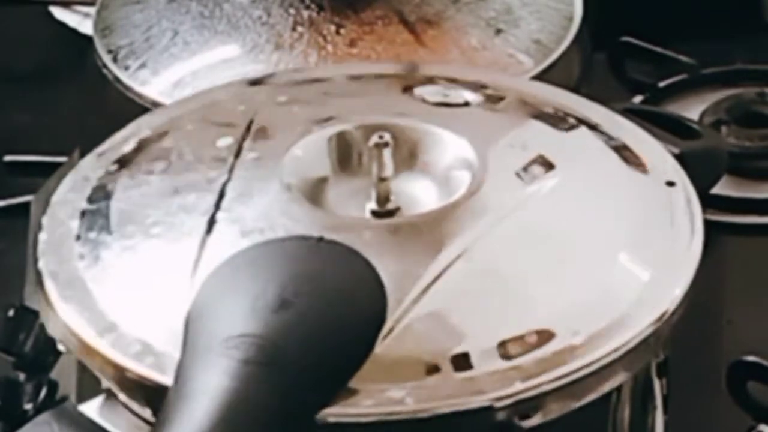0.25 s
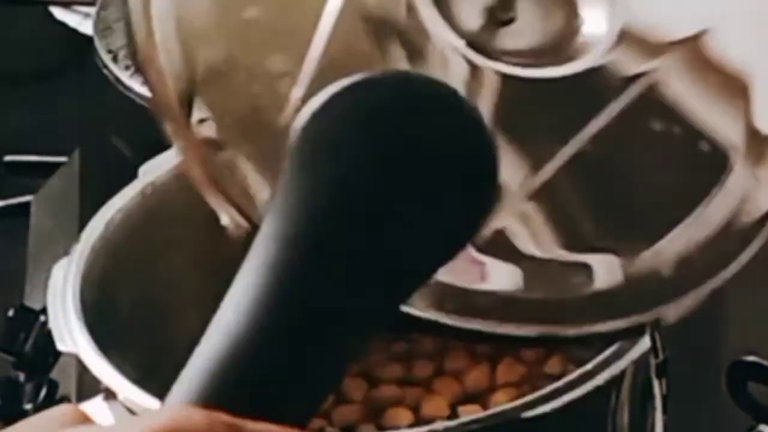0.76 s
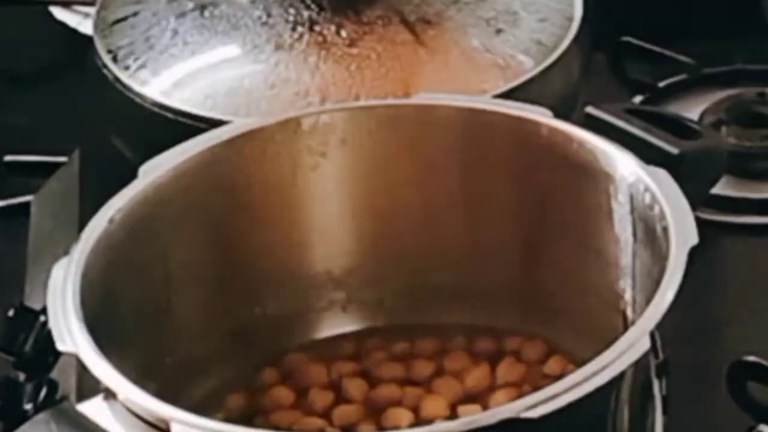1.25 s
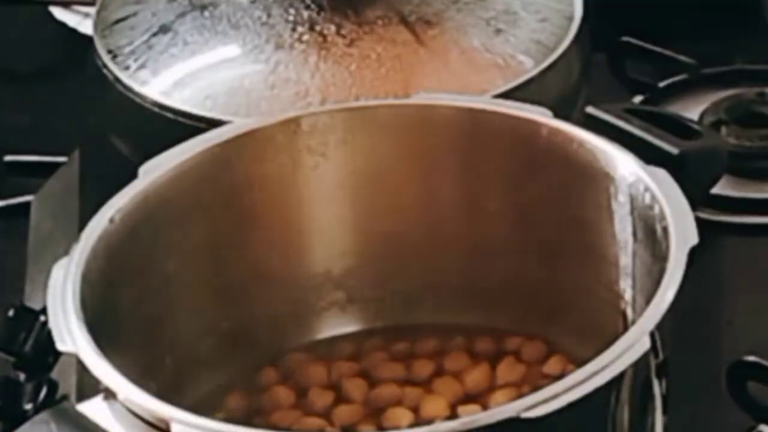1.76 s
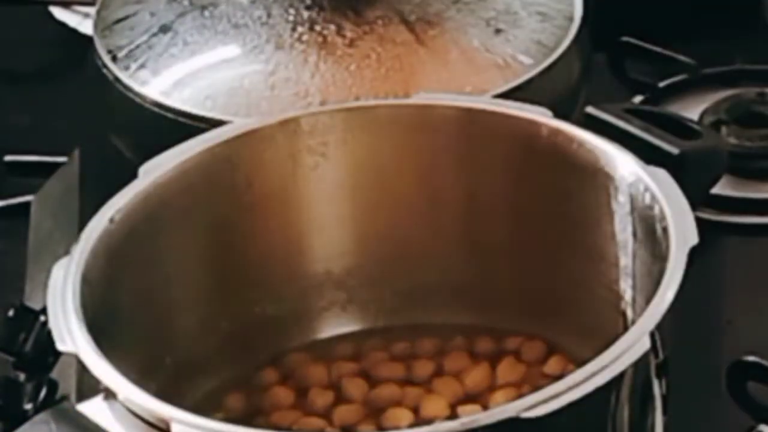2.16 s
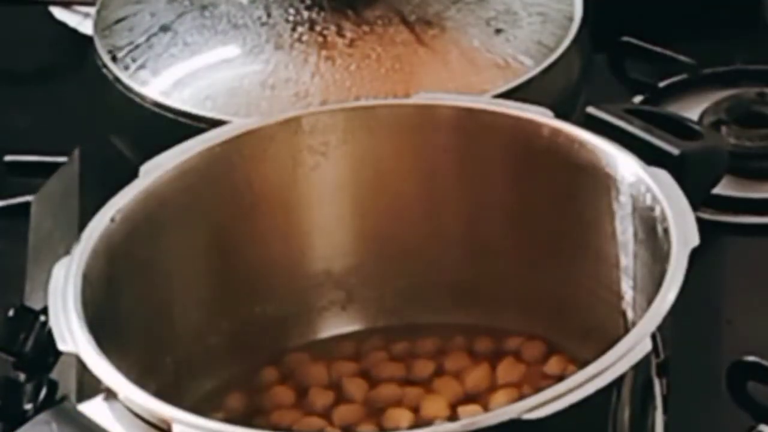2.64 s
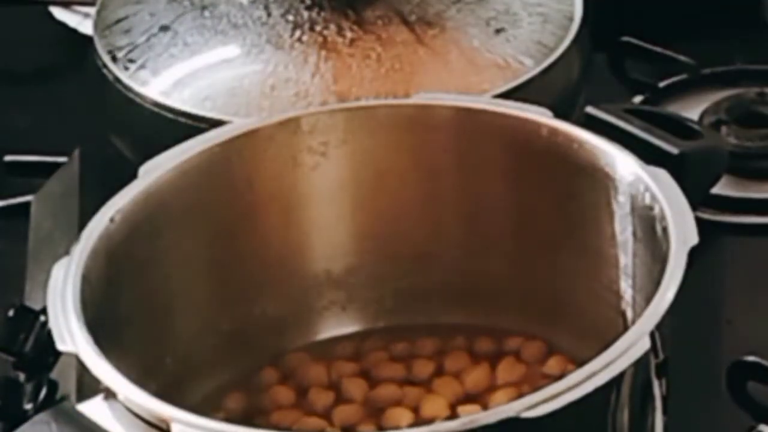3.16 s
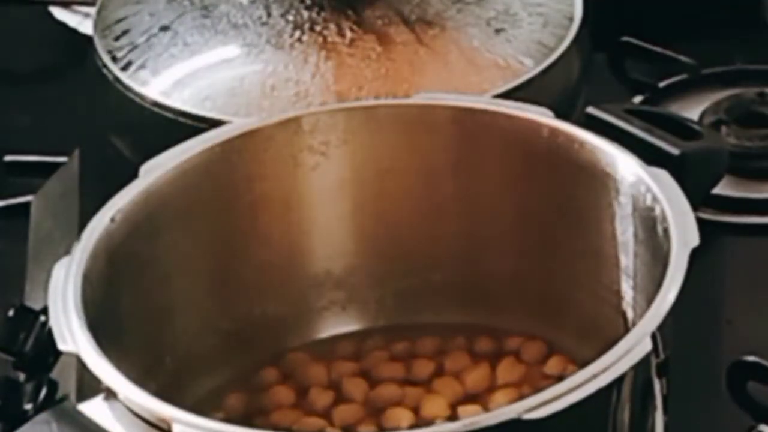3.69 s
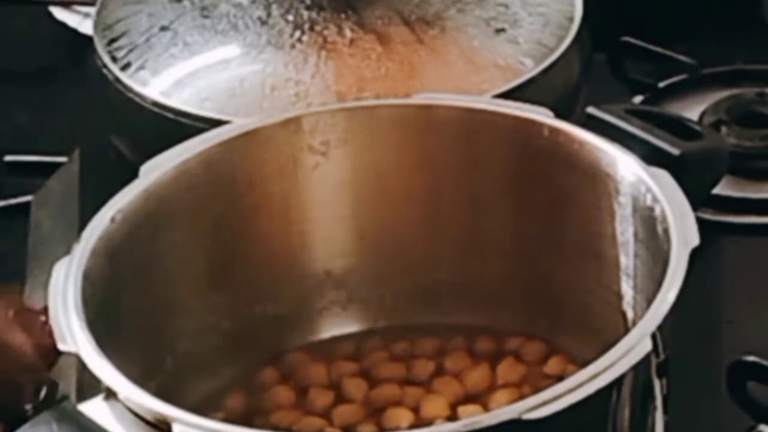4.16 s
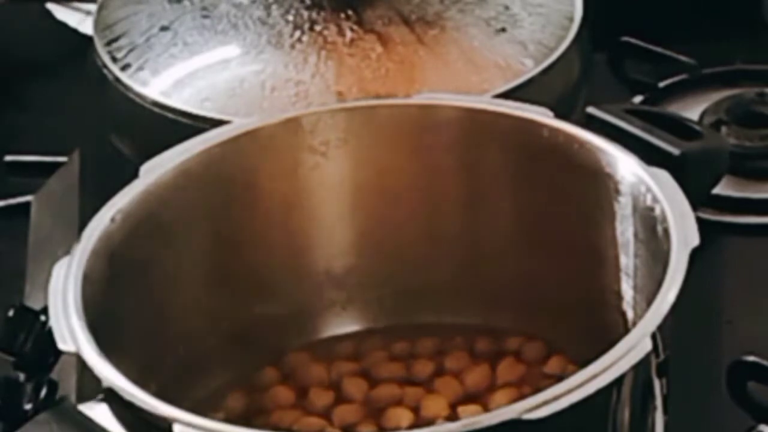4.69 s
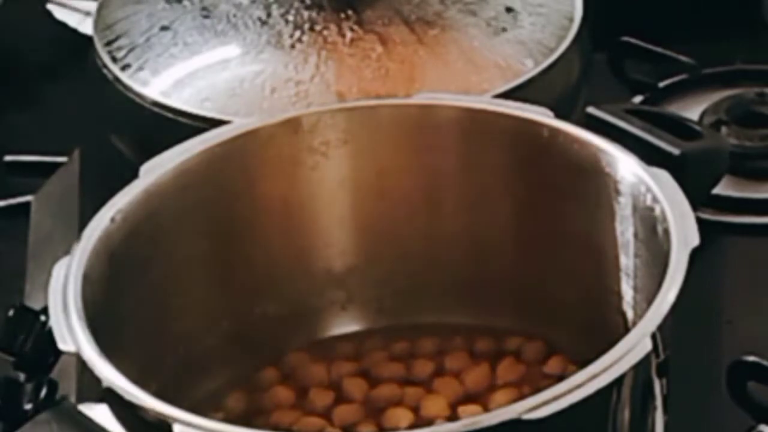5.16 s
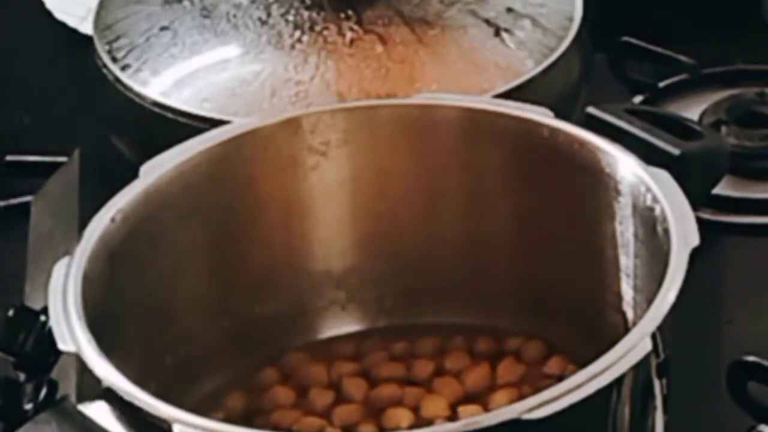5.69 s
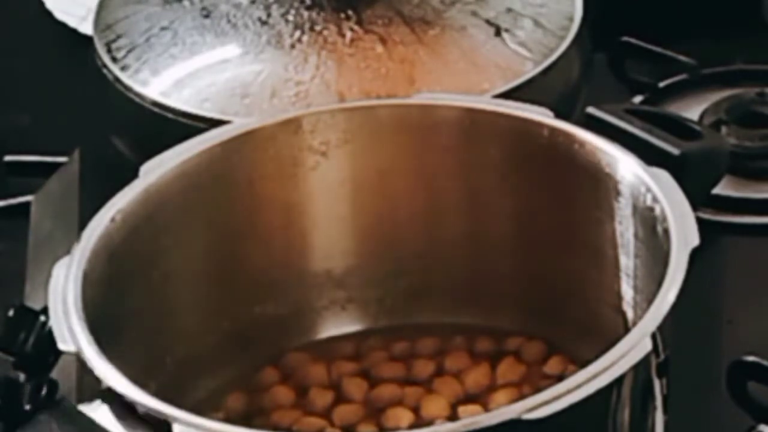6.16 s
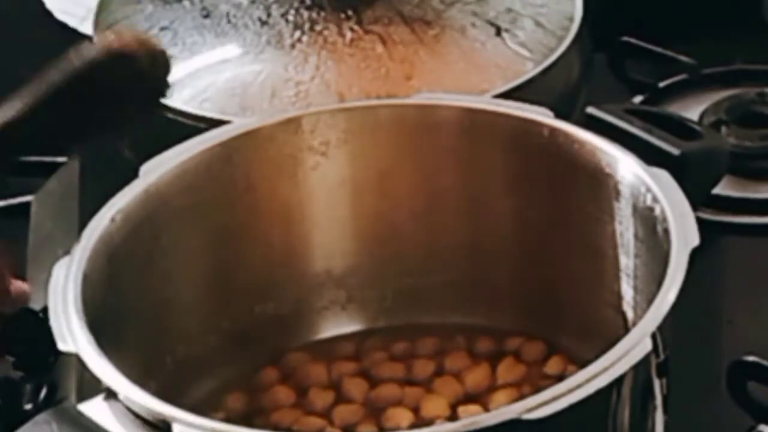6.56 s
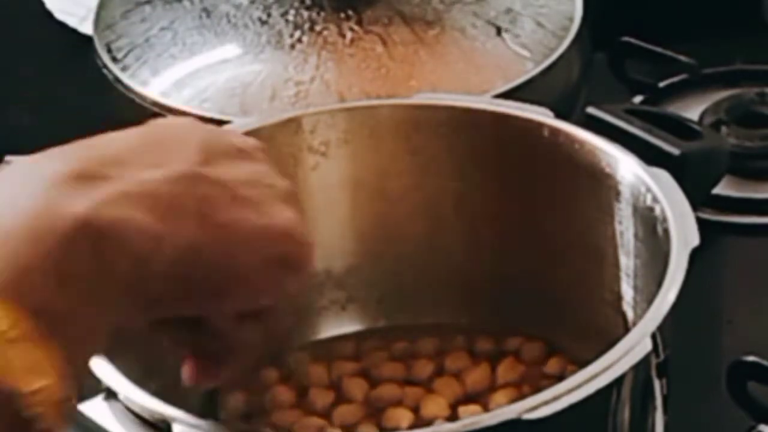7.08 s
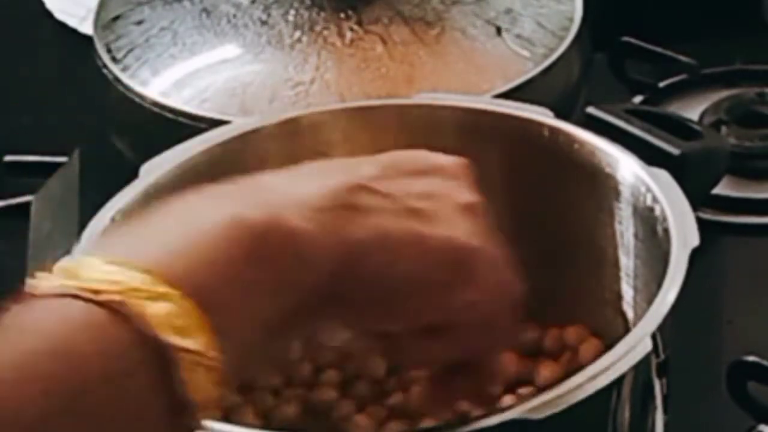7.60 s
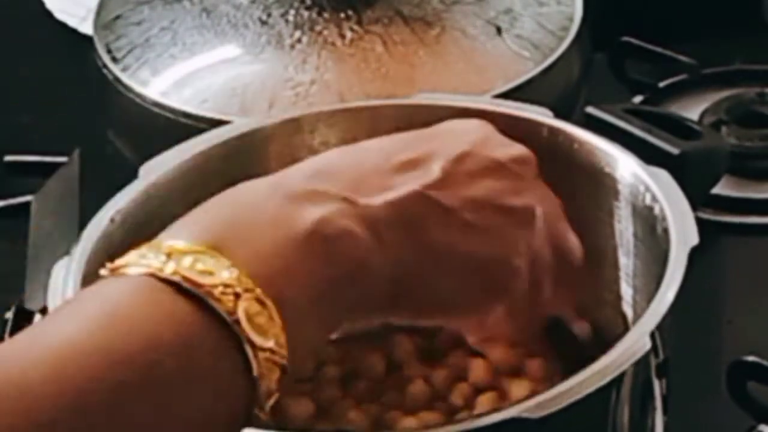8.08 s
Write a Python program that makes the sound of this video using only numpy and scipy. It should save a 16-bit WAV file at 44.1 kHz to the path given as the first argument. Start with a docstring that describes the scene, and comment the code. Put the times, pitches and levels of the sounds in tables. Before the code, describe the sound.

Quiet scraping of a metal lid and a soft, low pop open the scene over thin, wavering burner hiss. Later the lid drops to one side with a ringing clatter that speeds up and dies, capped by a sharp slap. Small metal clinks and duller knocks follow, then near quiet. A tool pushes soft, grainy chickpeas in a pot and strikes the wall with a bright clank. Close microphones, short lively kitchen echo.

```python
"""A steel pressure cooker is opened in a small hard-walled kitchen: the lid scrapes out of its lugs and pops free.
It is set down to one side, rattles to rest and its handle slaps down; utensils knock and clink on the counter.
Then a masher taps into the pot of chickpeas and clanks on the steel wall, over the thin hiss of the stove.
Blows are modal: noise bursts stand for dense, short-lived modes, and decaying sines for modes that ring on.
Shaped stereo noise makes the stove and room at rest; echoes and a diffuse tail make the kitchen."""
import sys
import numpy as np
from scipy import signal
from scipy.fft import rfft, irfft
from scipy.io import wavfile
from scipy.ndimage import map_coordinates

SR = 44100
rng = np.random.default_rng(int(sys.argv[2]) if len(sys.argv) > 2 else 0)


def store_pcm(level_fs):
    """Save levels as 16-bit WAV."""
    pcm = np.round(np.clip(level_fs, -1, 1) * 32767).astype(np.int16)
    wavfile.write(sys.argv[1], SR, np.atleast_2d(pcm).T)


N = 367794

# Blow levels are relative: each layer's gain_db is added to them.
# Colours and mode levels are relative too, since each sound is scaled to unit energy.
# dense modes of a tapped pot, also used for the chickpeas: hz, level_db
POT_COLOUR = [(150, -27.5), (320, -9.5), (520, -3.5), (680, -16), (850, 3), (1050, -7), (1750, -1.5),
              (2300, -13.5), (2900, -9), (3900, -28.5), (4400, -27.5), (6000, -35), (15000, -46)]

SIZE = 2 ** 15   # samples in one blow or room response
HZ = np.maximum(np.arange(SIZE // 2 + 1) * SR / SIZE, 1)
AGE = np.arange(SIZE) / SR   # seconds since the blow


def opening(room):
    """Stick-slip friction grates the lugs and rings the rim; the released gasket gives a hollow pop."""
    # the lid scraping along the rim: start_s, level_db, brightness_db_per_octave
    scrapes = [(0.233, -34, 9), (0.244, -33.5, -2.5), (0.324, -34.5, 2.5), (0.356, -38.5, -1),
               (0.507, -31, -1)]
    # the rubber gasket letting go: start_s, level_db, brightness_db_per_octave
    pops = [(0.514, -28, 2), (0.52, -25, -4.5), (0.585, -41, 1)]
    # dense modes of the scrape, then of the pop: hz, level_db
    scrape_colour = [(60, -16), (110, 4), (200, -1.5), (850, -5.5), (1100, -7.5), (1750, -2), (2800, -10),
                     (4200, -10), (5400, -16.5), (7300, -5), (15000, -25.5)]
    pop_colour = [(60, -63), (160, -16.5), (245, 7), (275, 16.5), (350, -9.5), (500, -22), (1200, -34),
                  (5000, -31)]
    # the pot's rim ringing under the lugs: hz, level_db
    rim_modes = [(823.6, -58), (1012, -90), (1319, -62), (1814, -93), (2299, -66), (2638, -68), (3036, -68),
                 (3203, -61.5), (3596, -70), (4323, -64.5)]
    scrape = struck(scrapes, scrape_colour, gain_db=13.5, patter_t60=0.053,
                    modes=rim_modes, ring_db=-2, ring_t60=0.067)
    pop = struck(pops, pop_colour, gain_db=22.0, patter_t60=0.0068)
    scrape_heard = placed(scrape, room, wet_db=7.5, lag_samples=7.5, pan_db=1.7)
    pop_heard = placed(pop, room, wet_db=-6.0, lag_samples=5.6, pan_db=5)
    return scrape_heard + pop_heard


def setting_down(room):
    """Repeated impacts excite the plate modes of the lid on the counter; then its handle slaps down."""
    # dense modes of the lid: hz, level_db
    lid_colour = [(80, -42), (200, -13.5), (300, -1.5), (520, -6), (760, -23), (1050, -19.5), (1330, 7),
                  (1600, -16), (2200, 5), (3000, -14.5), (4500, -13), (5200, -25), (8000, -23),
                  (15000, -34.5)]
    # modes of the lid that ring on: hz, level_db
    lid_modes = [(958.2, -49), (1082, -50), (1308, -34), (1766, -44), (1906, -36), (1976, -44), (2056, -36),
                 (2099, -39), (2250, -37), (2320, -39), (2347, -41), (2417, -41), (2589, -47), (2643, -44),
                 (2686, -45), (3278, -48), (3391, -52), (3865, -59), (4113, -53), (4226, -49), (4404, -52),
                 (4764, -53)]
    # the handle slapping down: start_s, level_db, brightness_db_per_octave
    slaps = [(2.764, -6, -0.25), (2.775, -16, -3), (2.792, -11, 1.5)]
    # dense modes of the slap: hz, level_db
    slap_colour = [(60, -35.5), (150, -17.5), (300, -3.5), (430, -10), (600, -10.5), (760, 4.5), (1000, -2),
                   (1500, -5), (2100, 4.5), (2600, -5), (3200, -1.5), (5300, -14), (7500, -7),
                   (10000, -14.5), (15500, -21.5)]
    # modes of the slap that ring on: hz, level_db
    slap_modes = [(780.6, -53), (969.0, -48), (1195, -56), (1303, -47), (1933, -51.5), (2099, -45.5),
                  (2256, -46), (2455, -51.5), (2923, -56), (3138, -47), (3408, -48), (3887, -57)]
    lid = struck(lid_rocking(), lid_colour, gain_db=18.5, patter_t60=0.016,
                 modes=lid_modes, ring_db=-1, ring_t60=.25)
    slap = struck(slaps, slap_colour, gain_db=16.5, patter_t60=0.014,
                  modes=slap_modes, ring_db=-12.5, ring_t60=0.34)
    lid_heard = placed(lid, room, wet_db=-1, lag_samples=1.9, pan_db=2.0)
    slap_heard = placed(slap, room, wet_db=6.5, lag_samples=1.6, pan_db=1.5)
    return lid_heard + slap_heard


def lid_rocking(lands_s=2.302, first_swing_s=.167, swings=7, landing_db=-7, rebound_db=-4.5, swing_loss_db=1.89):
    """A rocking plate loses energy at each impact, so its swings grow shorter and weaker."""
    swing = np.arange(swings)
    intervals = first_swing_s / (1 + swing / 2) ** 2
    times = lands_s + np.cumsum(intervals)
    levels = rebound_db - swing_loss_db * swing
    return by_force([(lands_s, landing_db), *zip(times, levels)], neutral_db=-7.5, brightening=.1)


def pot_and_masher(room):
    """Damping sets the ring: light taps die early, while a clank on bare steel rings longer."""
    # crisp ticks of handling: start_s, level_db, brightness_db_per_octave
    ticks = [(3.114, -45, -1.5), (6.735, -42.5, 2.7)]
    # light taps on the pot, from lid, hand and masher: start_s, level_db, brightness_db_per_octave
    pot_taps = [(0.012, -41.5, 1.5), (0.636, -43.5, -1), (1.245, -60.5, -1), (3.155, -34, 2.5),
                (3.511, -34, 0.5), (7.279, -42, 7.5), (7.370, -31.5, 5), (7.457, -40, -3.5),
                (8.176, -33, 0)]
    # the masher clanking on the steel wall: start_s, level_db, brightness_db_per_octave
    clanks = [(8.024, -13, 1.5), (8.061, -24, -4.5)]
    # dense modes of the ticks, then of the clanks: hz, level_db
    tick_colour = [(400, -19.5), (1500, -21.5), (3200, -11.5), (5500, -21), (7500, -15), (10000, -24),
                   (15000, -27)]
    clank_colour = [(70, -26), (200, -18.5), (300, -7), (420, -17), (1000, -6.5), (2300, -2), (2750, -7.5),
                    (3250, 5.5), (4100, -5), (5700, -8), (7100, 2), (9000, -15), (15500, -20)]
    # modes that ring on in the tapped pot, then in the clanking wall: hz, level_db
    pot_modes = [(861.3, -45), (1168, -47), (1707, -54), (1879, -51), (2842, -56)]
    wall_modes = [(1717, -54), (2374, -55), (3208, -41), (3661, -48), (3709, -52), (4355, -61), (4947, -60),
                  (5297, -64), (6686, -58), (6891, -58), (7391, -57), (8872, -69)]
    tick = struck(ticks, tick_colour, gain_db=24, patter_t60=0.012)
    taps = struck(pot_taps, POT_COLOUR, gain_db=21.0, patter_t60=0.017,
                  modes=pot_modes, ring_db=-2.0, ring_t60=0.097)
    clank = struck(clanks, clank_colour, gain_db=19.5, patter_t60=0.018,
                   modes=wall_modes, ring_db=-4, ring_t60=.28)
    return placed(tick + taps + clank + chickpeas(), room, wet_db=6, lag_samples=5.1, pan_db=1.0)


def chickpeas(count=12, spread_db=3, settle_s=0.31, settle_db_per_s=63):
    """Granular contact: each push sets off little soft contacts that fade as the chickpeas settle."""
    # the masher pushing in: start_s, level_db of the first contacts
    pushes = [(7.56, -45), (7.819, -50), (8.161, -38.5)]
    contacts = []
    for start_s, level_db in pushes:
        # one contact at a random moment in each equal slot
        delays = settle_s * (np.arange(count) + rng.random(count)) / count
        levels = level_db - settle_db_per_s * delays + spread_db * rng.standard_normal(count)
        brightness = 1.5 + rng.normal(0, 4, count)   # dB per octave
        contacts += zip(start_s + delays, levels, brightness)
    in_time = [contact for contact in contacts if contact[0] < N / SR]
    return struck(in_time, POT_COLOUR, gain_db=11, patter_t60=0.012)


def utensils(room, touch_lead_s=.009, touch_db=-8):
    """Impact force sets brightness: light clinks and duller knocks take turns on the counter."""
    # light utensils clinking: start_s, level_db
    clink_blows = [(3.324, -23.5), (3.795, -24.5), (4.296, -29), (4.761, -26)]
    # knocks on the counter: start_s, level_db
    knock_blows = [(3.557, -17), (4.004, -14.5), (4.420, -26.5), (4.946, -17), (5.753, -36), (6.487, -45.5),
                   (7.012, -39)]
    # dense modes of the clinks, then of the knocks: hz, level_db
    clink_colour = [(100, -29), (260, -8), (500, -7), (780, -8), (1500, -7), (2050, 2), (2800, -14),
                    (3300, -10), (4800, -33), (6000, -27), (9000, -33), (15000, -38)]
    knock_colour = [(100, -36), (300, -12), (590, -7), (720, -13), (870, 0), (1200, 0), (1950, -1),
                    (2300, -9), (3100, -15), (4200, -33), (6000, -33), (15000, -43)]
    # modes that ring on in the clinks, then in the knocks: hz, level_db
    clink_modes = [(1875, -5), (1976, -2), (2062, 0), (2225, -3), (3278, -5)]
    knock_modes = [(1120, -8), (1530, -1), (1810, 0), (1940, -5)]
    # each clink comes just after a softer, dull touch
    touches = [(s - touch_lead_s, db + touch_db) for s, db in clink_blows]
    light = by_force(clink_blows, neutral_db=-27, brightening=0.26)
    dull = by_force([*knock_blows, *touches], neutral_db=-23.0, brightening=.42)
    clinks = struck(light, clink_colour, gain_db=22.0, patter_t60=0.012,
                    modes=clink_modes, ring_db=-1, ring_t60=0.053)
    knocks = struck(dull, knock_colour, gain_db=19.5, patter_t60=0.026,
                    modes=knock_modes, ring_db=-3.5, ring_t60=0.12)
    return placed(clinks + knocks, room, wet_db=2, lag_samples=0.8, pan_db=2.0)


def by_force(blows, neutral_db, brightening):
    """Harder contact is brighter: so many dB per octave for each dB above a neutral blow."""
    return [(s, db, brightening * (db - neutral_db)) for s, db in blows]


def struck(blows, colour, gain_db, patter_t60, modes=None, ring_db=0, ring_t60=1):
    """Modal excitation: each blow is a brief crowd of modes in the thing's colour, plus modes that ring on."""
    out = np.zeros(N + SIZE)
    body = causal(from_db(at_hz(colour, HZ)))
    octaves = np.log2(np.clip(HZ, 300, 4000) / 1500)   # the brightness tilt pivots at 1500 Hz
    for start_s, level_db, brightness in blows:
        # bending waves smear the click in time and leave its spectrum nearly even
        contact = rfft(rng.standard_normal(SIZE) * AGE / patter_t60 * dying(patter_t60))
        strength = np.abs(contact)
        contact = contact * causal(1 / np.hypot(strength, .5 * strength.mean()))
        sound = unit_energy(irfft(contact * body))
        if modes is not None:
            sound = sound + from_db(ring_db) * ringing(modes, ring_t60)
        tilt = causal(from_db(brightness * octaves))
        sound = unit_energy(irfft(rfft(sound) * tilt))
        start = max(round(start_s * SR), 0)
        out[start:start + SIZE] += from_db(level_db + gain_db) * sound
    return out[:N]


def ringing(modes, t60, spread_db=-1.96):
    """Modal superposition of decaying sines; each blow lands elsewhere and shares its force out anew."""
    hz, db = np.transpose(modes)
    level = from_db(db + spread_db * rng.standard_normal(len(hz)))
    strength = level * rng.choice([-1, 1], len(hz))
    sines = np.sin(2 * np.pi * np.outer(hz, AGE))
    return unit_energy(strength @ sines * dying(t60))


def causal(gain):
    """Causality: the minimum-phase response with this gain, so nothing sounds before the blow."""
    cepstrum = irfft(np.log(gain))
    # fold negative time onto positive time
    cepstrum[1:SIZE // 2] *= 2
    cepstrum[SIZE // 2 + 1:] = 0
    return np.exp(rfft(cepstrum))


def dying(t60):
    """Exponential decay: an envelope that loses 60 dB in t60 seconds."""
    return np.exp(-np.log(1000) * AGE / t60)


def from_db(db):
    """Logarithmic level: decibels to amplitude gain."""
    return 10 ** (np.asarray(db) / 20)


def unit_energy(x):
    """Energy normalization: scale to a summed square of one, averaged over channels."""
    return x / np.sqrt(np.mean(np.sum(x ** 2, axis=-1)) + 1e-20)


def at_hz(points, hz):
    """Interpolation in pitch: read a table on a log-frequency axis."""
    table = np.array(points)
    return np.interp(np.log(hz), np.log(table[:, 0]), table[:, 1])


def placed(sound, room, wet_db, lag_samples, pan_db):
    """Arrival-time and level differences place a source: the left lags, pan is left minus right."""
    left = map_coordinates(sound, [np.arange(N) - lag_samples], order=3)
    direct = np.array([left, sound])
    reverberant = signal.fftconvolve(sound[None], room, axes=1)[:, :N]
    both = direct + from_db(wet_db) * reverberant
    return both * from_db(np.array([[pan_db], [-pan_db]]) / 2)


def kitchen_response(build_s=0.0029, boom_hz=317, boom_t60=0.17, boom_db=-21):
    """Room acoustics: near-wall echoes, a diffuse tail dying band by band, and one low standing wave."""
    # reverberation time by frequency: hz, t60_s
    reverberation = [(100, 0.5), (320, 0.39), (800, 0.29), (2000, 0.34), (5000, .39), (14000, 0.2)]
    # reflections from near walls: delay_s, level_db
    wall_echoes = [(.003, -14), (.0059, -15.5), (.0086, -7), (0.0116, -17)]
    noise, hz = diffuse(SIZE)
    centres = np.geomspace(60, 16000, 9)
    tail = 0
    for centre, share in zip(centres, np.eye(len(centres))):
        # overlapping triangular bands on the log-frequency axis
        band = irfft(noise * np.interp(np.log(hz), np.log(centres), share))
        t60 = at_hz(reverberation, centre)
        tail = tail + band * dying(t60) / np.sqrt(t60)
    tail = unit_energy(tail * (1 - np.exp(-AGE / build_s)))
    for delay, db in wall_echoes:
        # each echo reaches the two microphones at slightly different times
        arrivals = np.abs(delay * SR + rng.normal(0, 6, 2)).astype(int)
        tail[[0, 1], arrivals] += from_db(db)
    # the standing wave swells before it dies
    boom = unit_energy(AGE * dying(boom_t60) * np.sin(2 * np.pi * boom_hz * AGE))
    return unit_energy(tail) + from_db(boom_db) * boom


def diffuse(size):
    """Diffuse-field coherence: spectrum of white stereo noise, alike mostly in the bass, and its frequencies."""
    # left-right correlation of diffuse sound: hz, correlation [-1 to 1]
    likeness = [(60, 0.23), (250, 0.85), (500, 0.66), (1000, 0.12), (2500, 0.034), (12000, 0.014)]
    hz = np.maximum(np.arange(size // 2 + 1) * SR / size, 1)
    mid, side = rfft(rng.standard_normal((2, size)))
    alike = np.clip(at_hz(likeness, hz), -.99, .99)
    return np.sqrt(1 + alike) * mid + np.sqrt(1 - alike) * side * [[1], [-1]], hz


def stove(rumble_db=-67.5, drone_db=-77, waver_db=0.65, wavers_per_s=13, pulse_db=2.0, pulses_per_s=4.7):
    """Shaped noise under slow modulation: steady rumble, swelling drone, and hiss that wavers and pulses."""
    # relative spectra of hiss, rumble and the rumble's one narrow resonance: hz, level_db_per_hz
    hiss_colour = [(1470, -53), (2500, -18), (2780, -19.5), (3170, -7), (3340, -11), (3420, -12.5),
                   (4500, -9.5), (5660, -24), (6010, -12.5), (6900, -3), (8040, 4.5), (8550, 0.5),
                   (9660, -17), (12300, -11), (15500, -29.5)]
    rumble_colour = [(15, -59), (25, -33), (75, -10), (172, -12), (204, -9.5), (229, -17.5), (324, -10.5),
                     (468, -19.5), (495, -19), (900, -25.5), (2500, -28.5), (3250, -55.5), (5500, -120)]
    drone_colour = [(40, -41.5), (66, -22), (76, 7.5), (86, -23.5), (200, -69.5), (1000, -110)]
    # slow drift of the hiss, before waver and pulse: time_s, level_db
    hiss_drift = [(0, -59.5), (2.1, -62), (3.0, -59), (8.34, -60.5)]
    # the drone swells while lid or pot is handled: start_s, end_s, level_db of the added gain
    handling = [(0, 1.297, -73), (2.301, 2.903, -63.5), (7.99, 8.4, -66.5)]
    t = np.arange(N) / SR
    drone = from_db(drone_db)
    for start, end, db in handling:
        drone = drone + from_db(db) * swell(start, end, fade=0.16)
    waver = np.interp(t * wavers_per_s, np.arange(SIZE), rng.standard_normal(SIZE))
    pulse = np.cos(2 * np.pi * pulses_per_s * t)
    drift = np.interp(t, *np.transpose(hiss_drift))
    hiss = from_db(drift + waver_db * waver + pulse_db * pulse)
    # the whole background dips briefly
    dip = from_db(-5 * swell(6.83, 7.3, fade=0.033))
    background = from_db(rumble_db) * steady(rumble_colour)
    background = background + drone * steady(drone_colour)
    background = background + hiss * steady(hiss_colour)
    return dip * background


def steady(colour):
    """Spectral shaping: stationary diffuse noise of a given colour, rms one over both channels."""
    noise, hz = diffuse(N)
    shaped = irfft(noise * from_db(at_hz(colour, hz)), N)
    return unit_energy(shaped) * np.sqrt(N)


def swell(start, end, fade):
    """A trapezoidal envelope that rises around start, holds at one and falls around end (s)."""
    t = np.arange(N) / SR
    return np.clip(np.minimum(t - start, end - t) / fade + .5, 0, 1)


def scene():
    """Superposition: every source sounds in the one kitchen."""
    room = kitchen_response()
    return opening(room) + setting_down(room) + utensils(room) + pot_and_masher(room) + stove()


def record(dry):
    """Band limiting: the recorder cuts the top steeply above 16 kHz with an elliptic low-pass."""
    lowpass = signal.ellip(12, .2, 110, 16000, fs=SR, output="sos")
    return signal.sosfilt(lowpass, dry)


dry = scene()
out = record(dry)
store_pcm(out)
```